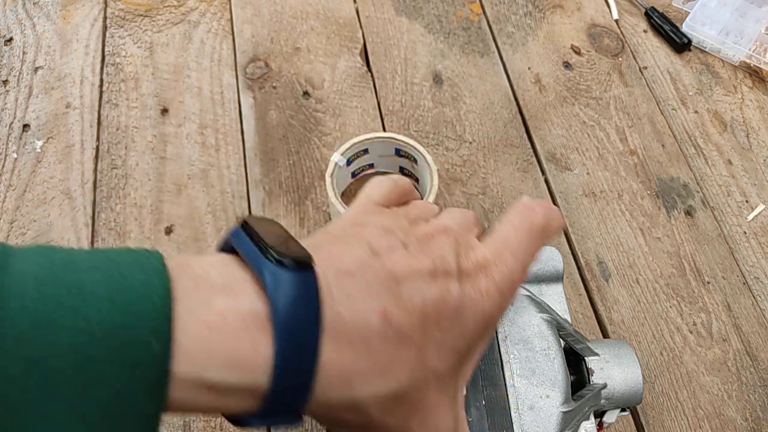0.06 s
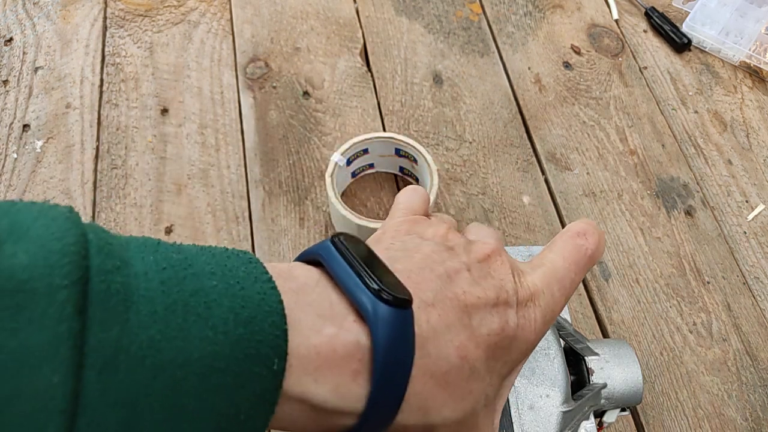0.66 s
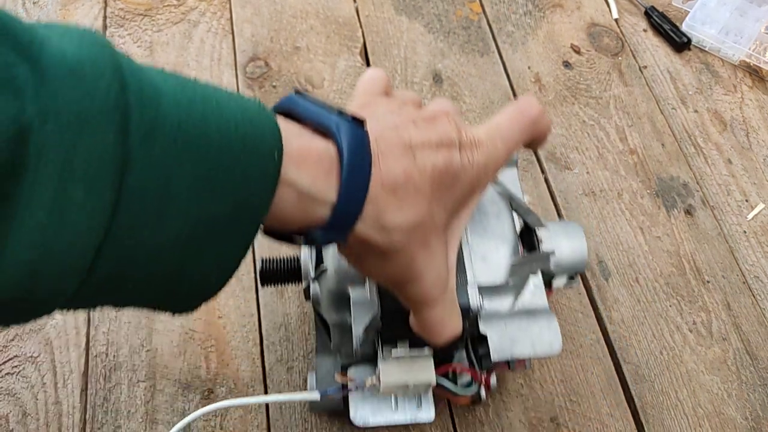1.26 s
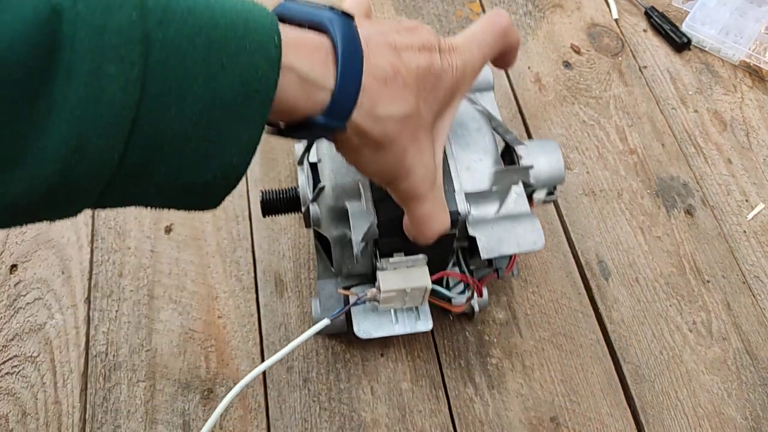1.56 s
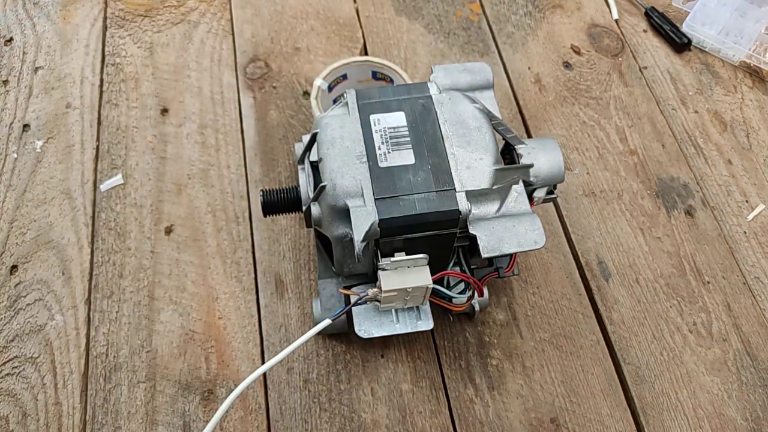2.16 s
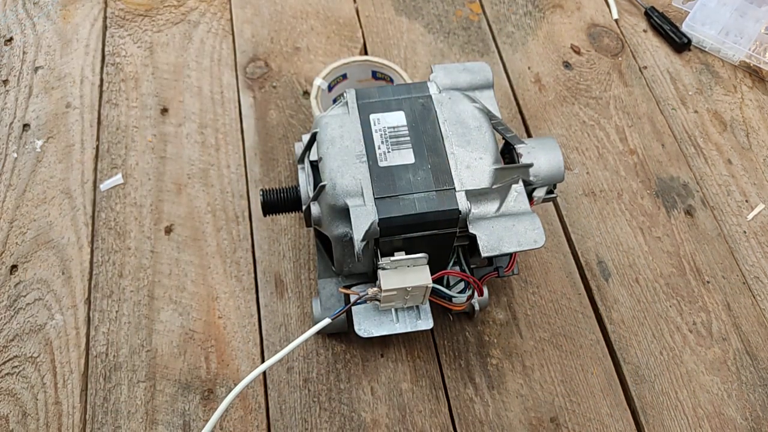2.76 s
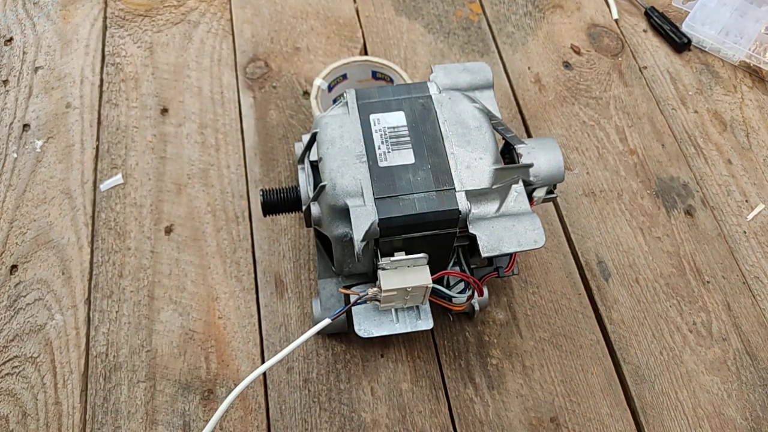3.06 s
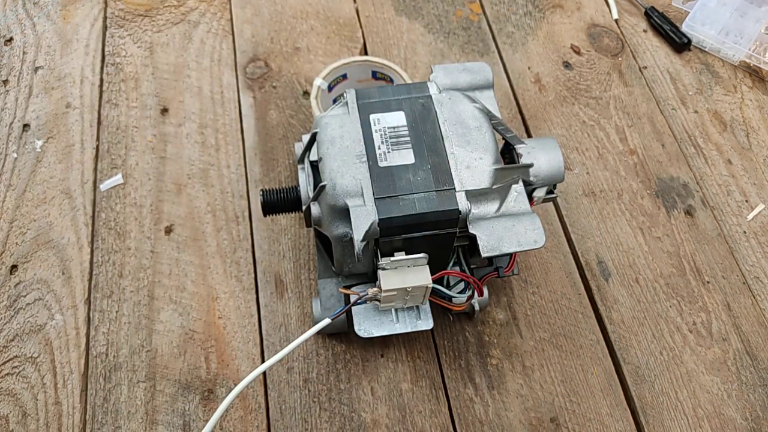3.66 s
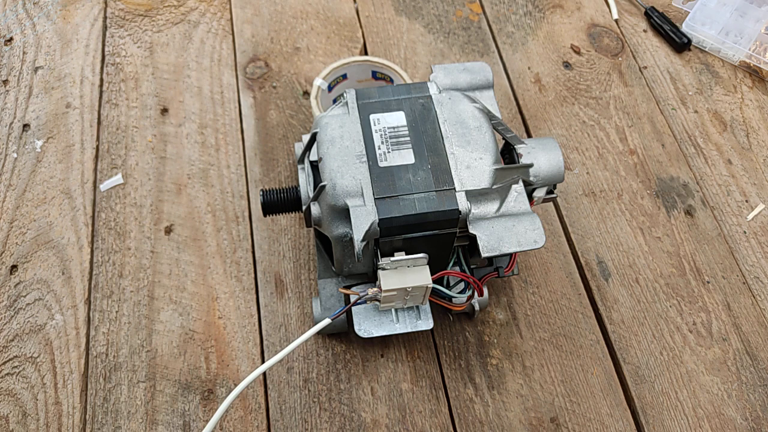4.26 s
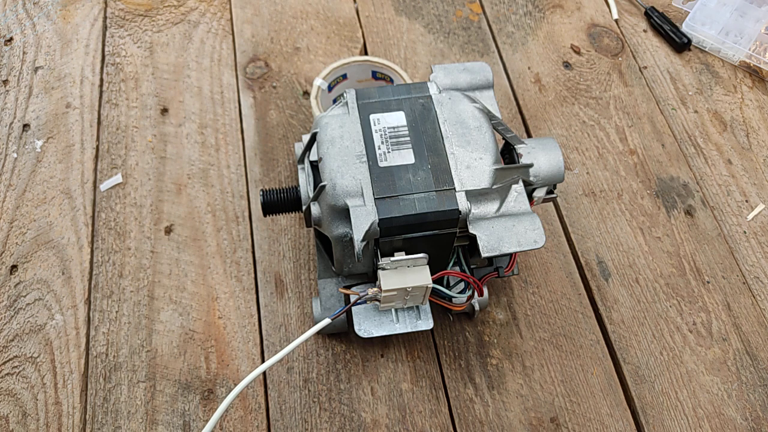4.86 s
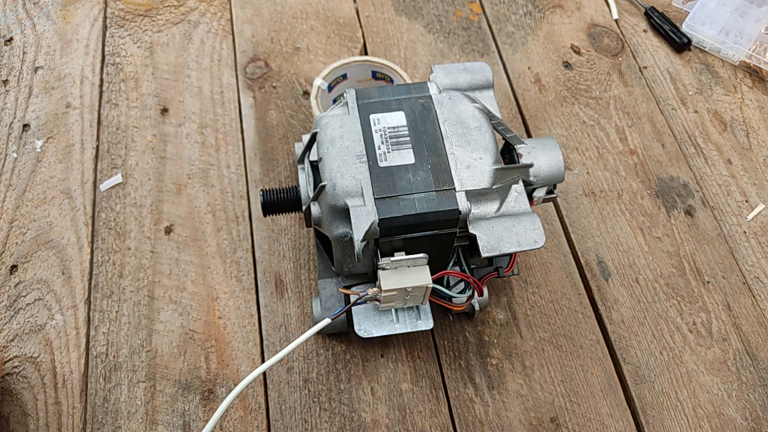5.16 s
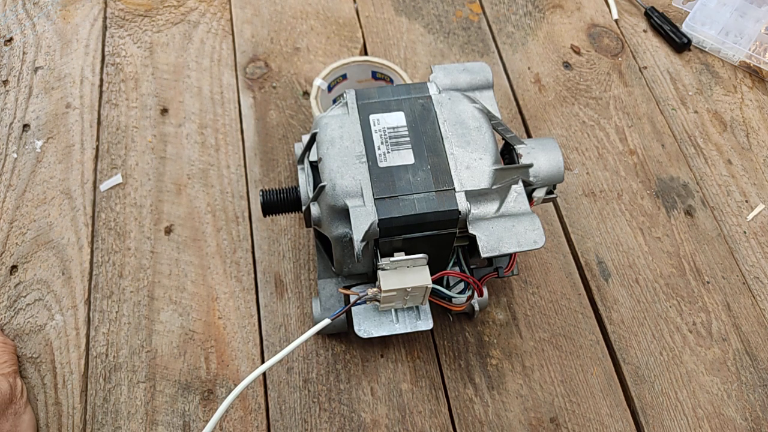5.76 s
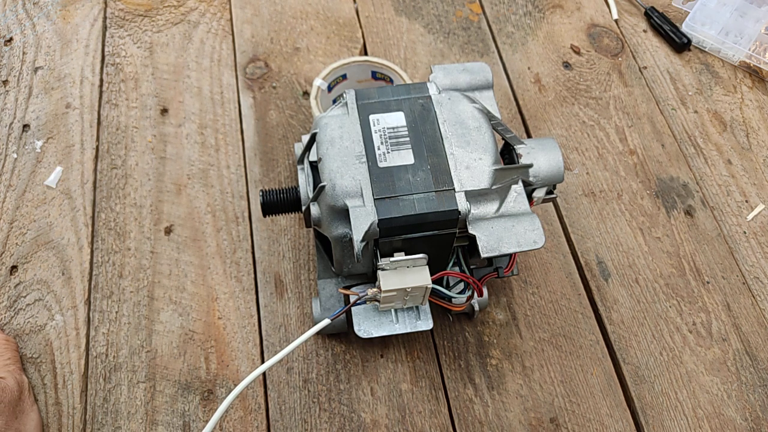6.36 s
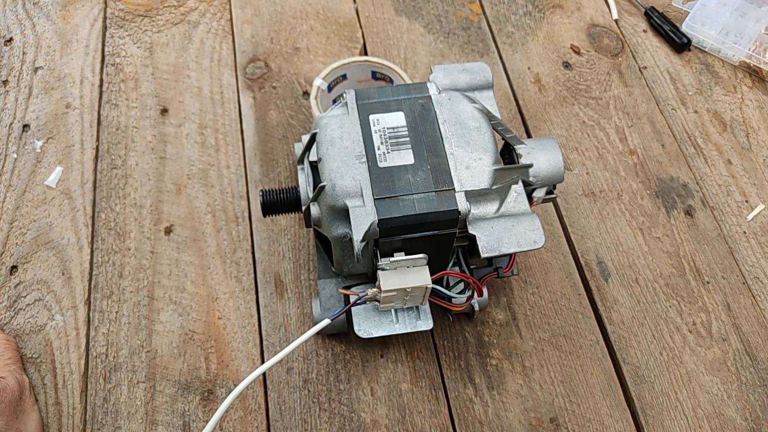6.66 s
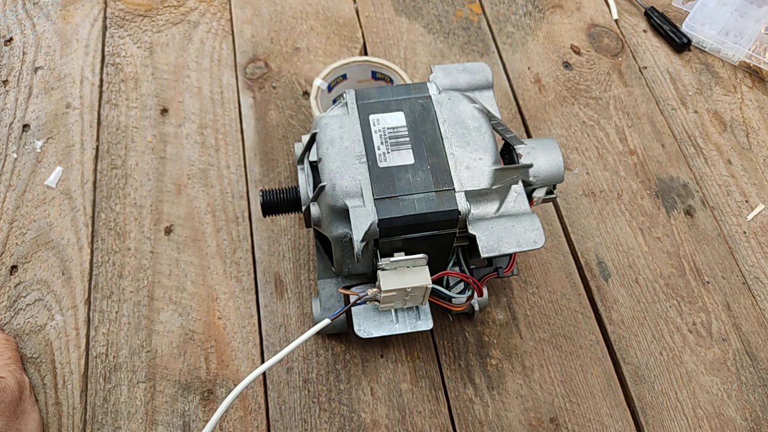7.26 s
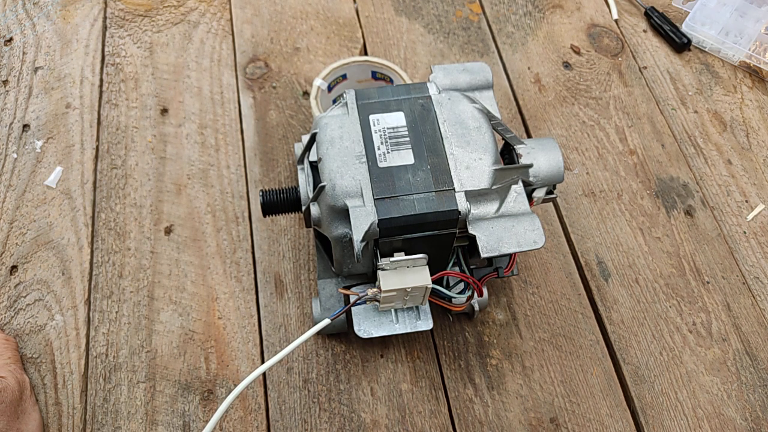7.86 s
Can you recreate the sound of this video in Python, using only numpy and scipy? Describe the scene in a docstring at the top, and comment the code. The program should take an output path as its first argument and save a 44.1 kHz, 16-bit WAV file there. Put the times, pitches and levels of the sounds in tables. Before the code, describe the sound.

High, steady whine of a brushed electric motor creeping up in pitch, its frame briefly rubbing and knocking across wooden planks.

```python
"""A bare washing-machine motor whines on a wooden bench, slowly gathering speed.
Its brushes chatter over the commutator once a turn and ring the metal housing into a high whine,
edged with a flickering hiss. Underneath, the rotor rushes and its unbalance hums through the bench.
Early on a hand pushes the motor across the planks, which groan and knock, and swings it round."""
import sys
import numpy as np
from scipy import signal
from scipy.fft import rfft, irfft
from scipy.io import wavfile

SR = 44100
rng = np.random.default_rng(int(sys.argv[2]) if len(sys.argv) > 2 else 0)


def digitize_waveform(pressure):
    """Quantize a signal to 16-bit integers and store it at the path in sys.argv[1].

    Rows of a 2-D input are taken as channels; values are limited to [-1, 1].
    """
    field = np.atleast_2d(pressure).T
    bounded = np.clip(field, -1, 1)
    quanta = np.round(bounded * 32767).astype(np.int16)
    wavfile.write(sys.argv[1], SR, quanta)


N = 358091
TIME, BINS = np.arange(N) / SR, np.fft.rfftfreq(N, 1 / SR)
CONTROL_TIME = np.arange(0, N / SR + .01, 1 / 1000)  # 1 ms steps for envelopes and modulation
SLIDE_MIDDLE_S, SLIDE_LENGTH_S = 1.395, 0.91

# Resonances of the planks: pitch_hz, width_hz, gain_db
PLANK_MODES = [(45, 79, -6), (178, 49, -1), (280, 23, -4.5), (366, 99, 0.5)]


def amp(db):
    """Decibels to gain."""
    return 10 ** (np.asarray(db) / 20)


def unit_rms(x):
    """Scales to an rms of one."""
    return x / np.sqrt(np.mean(abs(x) ** 2) + 1e-20)


def curves(table, t=TIME):
    """The columns of a timed table, joined by straight lines."""
    times, *columns = np.transpose(table)
    return [np.interp(t, times, column) for column in columns]


def spectra(table):
    """The columns of a frequency table, joined on a log axis."""
    hz, *columns = np.transpose(table)
    return [np.interp(np.log(BINS + 1), np.log(hz), column) for column in columns]


def to_audio(control):
    """Brings a control signal up to audio rate."""
    return np.interp(TIME, CONTROL_TIME, control)


def pan(db):
    """Stereo gains of unit mean power; db is left minus right."""
    sides = np.array([amp(db), amp(0 * db)]).reshape(2, -1)
    return sides / np.sqrt(np.mean(sides ** 2, 0))


def peak(f, hz, width):
    """Gain of a steep-sided resonance."""
    return 1 / (1 + (2 * (f - hz) / width) ** 2)


def swell(middle_s, length_s):
    """A smooth rise from zero to one and back."""
    return np.cos(np.pi * np.clip((TIME - middle_s) / length_s, -.5, .5)) ** 2


def flutter(hz):
    """Complex random modulation, rolling off above hz."""
    f = np.fft.fftfreq(len(CONTROL_TIME), CONTROL_TIME[1])
    white = rng.standard_normal(len(f)) + 1j * rng.standard_normal(len(f))
    return unit_rms(np.fft.ifft(white / (1 + (f / hz) ** 4)))


def wobble(hz):
    """Real random modulation of unit rms."""
    return unit_rms(flutter(hz).real)


def noise(spectrum, correlation):
    """Two channels of partly shared noise with the given spectrum."""
    left, independent = rfft(rng.standard_normal((2, N)))
    right = correlation * left + np.sqrt(1 - correlation ** 2) * independent
    return unit_rms(irfft(np.array([left, right]) * spectrum, N))


def tone(angle, db, waver=0.093, waver_hz=5):
    """A sine that wavers in level and phase."""
    envelope = to_audio(1 + waver * flutter(waver_hz))
    carrier = np.exp(1j * (angle + 2 * np.pi * rng.random()))
    return np.sqrt(2) * amp(db) * (envelope * carrier).real


def shaft_speed(t, top_hz=340.348):
    """Turns a second: the motor gains speed ever more slowly."""
    # Slow and quick lag behind top speed: shortfall_hz, time_constant_s
    lags = [(58.129, 6.141), (2.737, .998)]
    return top_hz - sum(shortfall * np.exp(-t / lag_s) for shortfall, lag_s in lags)


def turned(t, middle_s=1.16, length_s=0.1):
    """How far the push has swung the motor round, from zero to one."""
    return np.clip(.5 + (t - middle_s) / length_s, 0, 1)


def rotor_rush(angle, level_db=-31, beat=0.18, speed_power=2.6, waver_db=0.85):
    """Air and rolling noise, growing with speed, wavering slightly and beating once a turn."""
    # Colour of the rotor and room noise: frequency_hz, density_db, pan_db
    colour = [(20, -19, -1), (60, -24, -15), (133, -19.5, 3), (237, -9, 3), (427, -8, 5.5), (763, -1, 1.5),
              (1110, -3, 0.5), (1770, 0, -0.5), (2040, 1.5, 1), (3030, 0, 1.5), (3650, -9.5, 17),
              (4660, -7, -10), (5100, -22, -7), (6070, -17, -10), (9000, -19, -19), (11900, -52, -4),
              (15000, -40, -8)]
    # How alike its two sides are: frequency_hz, correlation
    likeness = [(100, 0.7), (300, 0.72), (600, 0.47), (1200, 0.43), (2500, 0.37), (5000, 0)]
    density_db, pan_db = spectra(colour)
    air = noise(amp(density_db) * pan(pan_db), spectra(likeness)[0])
    waver = amp(waver_db * to_audio(wobble(hz=6)))
    speed = shaft_speed(TIME)
    growth = (speed / speed.mean()) ** speed_power
    return amp(level_db) * unit_rms(air * waver * growth * (1 + beat * np.cos(angle)))


def rotor_hum(angle, muffle_db=-22):
    """Rotor unbalance shakes the bench; each multiple (order) of the shaft speed swells at a resonance."""
    # Resonances of the bench: pitch_hz, width_hz, level_db
    bench_modes = [(286, 21, -44), (304.3, 17.4, -37.5), (318.3, 16.3, -39.5), (566, 18, -38),
                   (583.4, 12.6, -36.5), (618, 26, -36.5), (617, 15, -31), (640, 16.5, -35),
                   (655.6, 8.9, -30.5), (823, 170, -45), (940, 110, -42.5), (1143, 12, -43),
                   (1166.5, 49, -37.5), (1199, 33, -41.5), (1241, 41, -45), (1313.6, 89, -35)]
    # Dips where the bench radiates poorly: pitch_hz, width_hz, gain_db
    dead_spots = [(620, 10, -20), (1228, 20, -5)]
    # Placement of shaft orders 1 to 4: pan_db
    order_pans = [4.4, 13, 6.7, 13]
    speed, out = shaft_speed(CONTROL_TIME), 0
    for order, pan_db in enumerate(order_pans, 1):
        pitch = order * speed
        body = np.sqrt(sum((amp(db) * peak(pitch, hz, width)) ** 2 for hz, width, db in bench_modes))
        dip = amp(sum(db * peak(pitch, hz, width) for hz, width, db in dead_spots))
        slide_db = muffle_db * swell(SLIDE_MIDDLE_S, SLIDE_LENGTH_S) if order == 1 else 0
        out += pan(pan_db) * to_audio(body * dip) * tone(order * angle, slide_db)
    return out


def bearing_tones(angle):
    """The bearings sing faint, unsteady tones that follow the shaft."""
    # Bearing partials: shaft_multiple, start_db, end_db
    partials = [(.385, -76, -58.5), (.77, -68, -61), (3.915, -48.5, -72)]
    return pan(db=6) * sum(tone(multiple * angle, np.linspace(start_db, end_db, N), waver=0.46)
                           for multiple, start_db, end_db in partials)


def mains_buzz(pitch_hz=100.7, octave_db=-7):
    """The field coils buzz with the mains: one low note and its octave."""
    # Envelope of the buzz: time_s, level_db
    envelope = [(0, -62), (3, -57.5), (5.4, -58.5), (5.9, -71)]
    level_db = curves(envelope)[0]
    angle = 2 * np.pi * pitch_hz * TIME
    return pan(db=6) * (tone(angle, level_db) + tone(2 * angle, level_db + octave_db))


def plank_groan(peak_s=1.26, let_go_s=2.05, peak_db=-39, rise_db_per_s=36, fall_db_per_s=22):
    """The pushed frame rubs over the planks, sticking and juddering until the hand lets go."""
    # Single judders on the wood: middle_s, pitch_hz, level_db, length_s
    judders = [(0.858, 283, -32, 0.088), (0.985, 357, -41, .04), (0.98, 98, -47, .2),
               (1.203, 362, -37, .06), (1.325, 363, -39, 0.1), (1.385, 156, -39, 0.078),
               (1.53, 162, -42, 0.088), (1.578, 342, -37, 0.079), (1.757, 181, -43, 0.033),
               (1.787, 45, -44, 0.064)]
    since_peak = TIME - peak_s
    rub_db = peak_db + np.minimum(rise_db_per_s * since_peak, -fall_db_per_s * since_peak)
    release = np.clip((let_go_s - TIME) / .05, 0, 1)
    wood = sum(amp(db) * peak(BINS, hz, width) for hz, width, db in PLANK_MODES)
    out = noise(wood, correlation=0.86) * amp(rub_db) * release
    for middle_s, hz, db, length_s in judders:
        envelope = np.sqrt(2) * amp(db) * swell(middle_s, length_s)
        out += envelope * np.sin(2 * np.pi * hz * (TIME - middle_s))
    return pan(db=3.5) * out


def plank_knocks(pivot_hz=200):
    """The frame catches on the wood; each knock rings the planks briefly."""
    # Hits of the frame: start_s, level_db, tilt_db_per_octave
    hits = [(1.177, -34, 7), (1.217, -38, -1), (1.262, -41, 2), (1.3, -45, -2), (1.331, -35, 2),
            (1.424, -45, 10), (1.511, -41, -7), (1.593, -45, -2), (1.747, -32, -2), (1.775, -36, -6)]
    out = np.zeros(N)
    for start_s, hit_db, tilt_db in hits:
        since = TIME - start_s
        ringing = (since > 0) & (since < .5)
        t = since[ringing]
        for hz, width, mode_db in PLANK_MODES:
            gain = amp(hit_db + mode_db + tilt_db * np.log2(hz / pivot_hz))
            out[ringing] += gain * np.exp(-np.pi * width * t) * np.sin(2 * np.pi * hz * t)
    return pan(db=6) * out


def high_hiss(angle, trim_db=-1, beat=0.12, grit_db=1.3):
    """A high, gritty hiss in two bands that flickers in level and pulses once a turn."""
    # Bands of the hiss, before and after the motor swings round:
    # centre_hz, width_hz, pan_db, before_db, after_db, flicker_db
    hiss_bands = [(7460, 600, -9, -41, -29.5, 2.1), (8540, 870, 5, -37.5, -38, 1)]
    swung = turned(TIME, middle_s=1.26, length_s=0.27)
    out = np.zeros((2, N))
    for hz, width, pan_db, before_db, after_db, flicker_db in hiss_bands:
        flicker = unit_rms(amp(flicker_db * wobble(hz=9) + grit_db * wobble(hz=160)))
        band = np.exp(-((BINS - hz) / width) ** 2)
        gain = amp(before_db + (after_db - before_db) * swung + trim_db)
        out += gain * to_audio(flicker) * noise(band * pan(pan_db), correlation=0)
    return out * unit_rms(1 + beat * np.cos(angle))


def whine_orders(bar_order=18, drive_db=1.5, fizz_db=-7):
    """Stereo gain curves by shaft order: the commutator bars' note, then chatter ringing the housing."""
    # Envelope of the bars' main note: time_s, left_db, right_db
    bar_note = [(0, -40, -35), (.6, -31.5, -28), (.95, -33.5, -32), (1.12, -31, -25.5), (1.22, -34, -29),
                (1.42, -33, -37), (1.65, -24.5, -38), (1.9, -31, -37), (2.3, -27, -35), (2.7, -32, -28),
                (3.15, -29.5, -31), (3.45, -25.5, -26.5), (4.2, -29, -23.5), (4.65, -28, -24.5),
                (4.9, -26.5, -23), (5.4, -28, -27), (6, -33, -23), (6.7, -38, -33), (7.2, -34, -41),
                (7.6, -36, -27.5), (8.12, -38, -40)]
    # Brush chatter around that note: shaft_order, force_db
    chatter = [(5, -3), (6, 7), (7, 6.5), (8, 1.5), (9, 4), (10, 6), (11, 7.5), (12, 5.0), (13, 8), (14, 6),
               (15, 7.5), (16, 7), (17, 10), (19, 9.5), (20, 7.0), (21, 8.5), (22, 3.5), (23, 4.5),
               (24, 2.5), (25, 5), (26, 4), (27, 3.5), (28, 5.5), (29, -2.0), (30, 4.5), (31, 0.5),
               (32, 2.5), (33, 1), (34, -3), (35, -4), (36, 11.5), (37, 0), (38, 4), (39, -6.0), (40, -7),
               (41, -6), (42, -15)]
    # Chatter envelopes in three bands: time_s, low_db, mid_db, high_db
    band_envelopes = [(0.0, -0.5, -6, -3), (0.6, -0.5, -3, -1.5), (1.05, -1.5, -4.5, -5), (1.3, 1, -3, 2.5),
                      (1.7, -2.5, -6.5, 0), (2.1, -1, -2, 0), (2.6, -0.5, -5, -1), (3.3, 0.5, -4, 1.0),
                      (4.0, -0.5, -3, 1), (4.7, 1.5, 0.0, 0), (5.35, 0.0, 0.5, 2.5), (5.9, 2, 2.5, 1.5),
                      (6.5, 0.5, 0.5, 3), (7.1, 2.5, 4, 0.5), (7.6, 2, 3.5, 1), (8.12, 3, 0, 1)]
    # Centres of those bands: frequency_hz
    band_centres = [5600, 6800, 8800]
    # How orders carry before the motor swings round: shaft_order, left_db, right_db
    first_facing = [(10, 5, -2), (11, 6.5, -1), (12, 6, 2), (13, 1.5, 1.5), (14, 6, -1), (15, -2.5, 0),
                    (16, -1, 0), (17, 2.5, 1.5), (19, -5, -11), (21, 4, -8), (22, 9, 7), (23, 11.5, -2),
                    (24, 14, 3), (25, 10, 0), (28, 4.5, 4.5), (29, 13.5, 5), (31, 5, -2), (33, 7.5, -1.5),
                    (34, 10, 4), (35, 8, -1.5), (36, 10.5, -1), (37, 9, -1), (38, -14, -3), (39, -4, 7),
                    (40, -8, 2), (41, -8, -8.5), (42, 6, 12)]
    # Resonances of the metal housing: pitch_hz, width_hz, left_db, right_db
    housing_modes = [(2050, 560, -53.5, -60), (2240, 41, -45.5, -53.5), (2453, 320, -44.5, -46),
                     (3000, 350, -55.5, -60.5), (3500, 380, -51, -46.5), (3850, 150, -48.5, -52),
                     (3970, 310, -53.0, -48), (4333, 215, -44, -55.5), (4613, 320, -47.5, -51),
                     (5070, 440, -45.5, -47), (5360, 134, -47, -44.5), (5710, 120, -59, -46.5),
                     (5715, 320, -70, -39.0), (5840, 120, -45, -41.5), (6130, 600, -47.5, -39),
                     (6340, 140, -49, -41.5), (6480, 81, -44, -59), (6795, 540, -55.5, -35.5),
                     (7060, 87, -42, -28.5), (7280, 106, -33, -30.5), (7496, 450, -39.5, -33.5),
                     (7880, 100, -49, -38.5), (8060, 310, -36, -37), (8378, 51, -37.5, -37),
                     (8590, 270, -38.0, -47.5), (8517, 290, -31.5, -47.5), (8680, 160, -32.5, -42),
                     (8830, 340, -29, -41.5), (9050, 167, -29.5, -41), (9210, 343, -33, -53),
                     (9430, 280, -59.0, -45.5), (9530, 560, -51, -47), (10190, 680, -48.5, -46.5),
                     (10800, 310, -56, -64), (10760, 620, -48.5, -52.5), (11300, 210, -50.5, -54.5),
                     (11520, 311, -65.5, -62.5), (12900, 2200, -53, -50), (14500, 1533, -44, -54),
                     (15159, 2700, -58, -55)]
    speed, bands_db = shaft_speed(CONTROL_TIME), curves(band_envelopes, CONTROL_TIME)
    facing_db = {order: np.array([[left], [right]]) for order, left, right in first_facing}
    fizz = [(order, fizz_db) for order in range(43, 57)]
    gains = [(bar_order, amp(curves(bar_note, CONTROL_TIME)))]
    for order, force_db in list(chatter) + fizz:
        pitch = order * speed
        envelope_db = sum(np.interp(pitch, band_centres, weights) * band_db
                          for weights, band_db in zip(np.eye(3), bands_db))
        askew_db = facing_db.get(order, 0) * (1 - turned(CONTROL_TIME))
        force = amp(force_db + drive_db + envelope_db + askew_db)
        body = np.sqrt(sum((amp([[left], [right]]) * peak(pitch, hz, width)) ** 2
                           for hz, width, left, right in housing_modes))
        gains.append((order, force * body))
    return gains


def brush_contact(blur, jostle, rough=.35, drift=.31):
    """One side's brush contact: it varies from turn to turn, drifts, and is jostled by the slide."""
    unevenness = rough * flutter(hz=50) + drift * flutter(hz=7 * blur)
    contact = 1 + blur * unevenness + jostle * flutter(hz=28)
    return contact / np.sqrt(1 + jostle ** 2)


def motor_whine(angle, slide_jostle=.55, wander_rad=.7, throb=.04, throb_hz=46.9):
    """Shaft orders climb through the housing's resonances, roughened by the brushes, faintly throbbing."""
    # The housing's sides vibrate out of step; the left's lead before and after the motor swings round:
    # frequency_hz, before_rad, after_rad
    phase_lead = [(2500, 0.5, -.5), (3620, 1.5, -.9), (3930, 0.7, 2.4), (4220, 1, 0.5), (4850, 2.5, -2.5),
                  (5260, 0.4, -1.4), (5480, 2.8, 0.1), (5550, 1.5, 0), (6360, 2.7, -.5), (6860, 3.5, 1),
                  (6900, 3.5, 0.5), (7420, 4, 3.5), (8100, 7.5, 4), (8380, 4.5, 4.5), (8840, 5, 3),
                  (9100, 4, 2.5), (9320, 2.5, 0.5), (10200, 6.2, 2), (10900, 4, 1), (13700, 5, 4.5)]
    # Flutter grows around 3.5-5 kHz and is strongest in the treble: frequency_hz, flutter_factor
    blur_curve = [(1500, .6), (2900, .6), (3500, 1.35), (4900, 1.45), (5600, .95), (8800, .9), (9400, 1.1),
                  (11000, 1.5), (13000, 1.4)]
    lead_hz, lead_before, lead_after = np.transpose(phase_lead)
    speed = shaft_speed(CONTROL_TIME)
    jostle = slide_jostle * np.interp(CONTROL_TIME, TIME, swell(SLIDE_MIDDLE_S, SLIDE_LENGTH_S))
    out = np.zeros((2, N))
    for order, gain in whine_orders():
        pitch = order * speed
        blur = np.interp(pitch.mean(), *np.transpose(blur_curve))
        contact = np.array([brush_contact(blur, jostle) for _ in range(2)])
        envelopes = gain * unit_rms(contact) * np.exp(2j * np.pi * rng.random())
        # The phase between the sides wanders as the order sweeps through the room's echoes.
        wander = wander_rad * min(pitch.mean() / 6000, 1) * wobble(hz=1.1)
        before, after = np.interp(pitch, lead_hz, lead_before), np.interp(pitch, lead_hz, lead_after)
        lead = before + (after - before) * turned(CONTROL_TIME)
        envelopes[0] *= np.exp(1j * (lead + wander))
        phase = (order * angle % (2 * np.pi)).astype(np.float32)
        cos, sin = np.cos(phase), np.sin(phase)
        for side, envelope in zip(out, envelopes):
            side += to_audio(envelope.real) * cos - to_audio(envelope.imag) * sin
    return np.sqrt(2) * out * (1 + throb * np.cos(2 * np.pi * throb_hz * TIME))


def scene():
    """One shaft angle drives all that spins; the mains buzz and the planks join in."""
    angle = 2 * np.pi * np.cumsum(shaft_speed(TIME)) / SR
    whine = motor_whine(angle)
    hum = rotor_hum(angle) + bearing_tones(angle) + mains_buzz()
    return whine + hum + rotor_rush(angle) + high_hiss(angle) + plank_groan() + plank_knocks()


def record(dry, cutoff_hz=15700):
    """A steep low-pass takes off the very top."""
    taps = signal.firwin(511, cutoff_hz, window=("kaiser", 9), fs=SR)
    return signal.oaconvolve(dry, taps[None], "same")


dry = scene()
out = record(dry)
digitize_waveform(out)
```